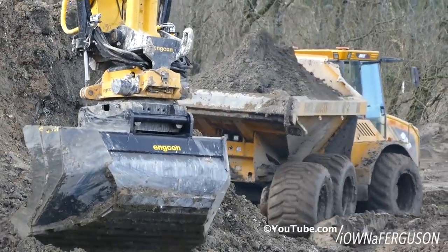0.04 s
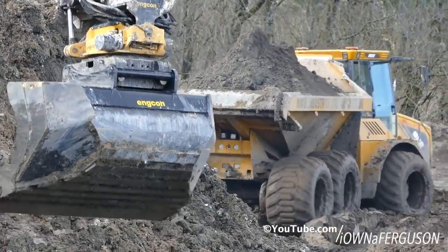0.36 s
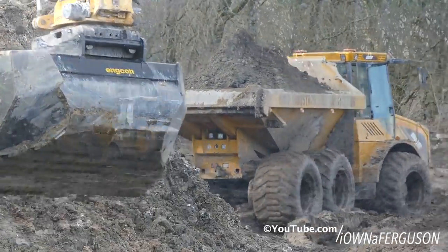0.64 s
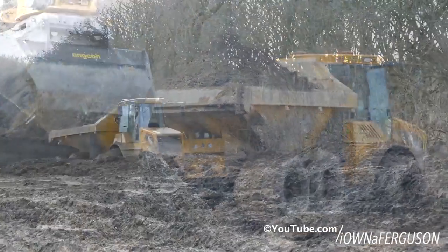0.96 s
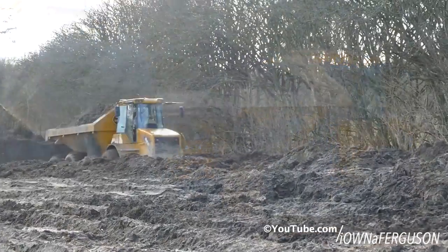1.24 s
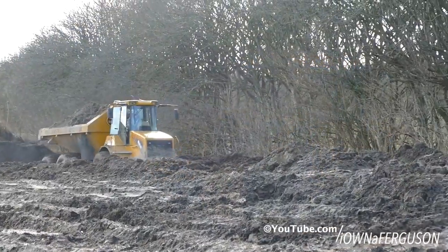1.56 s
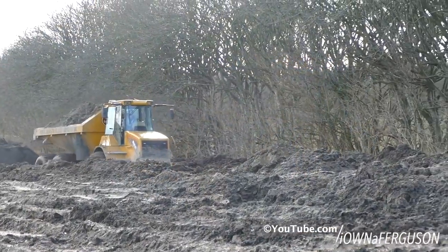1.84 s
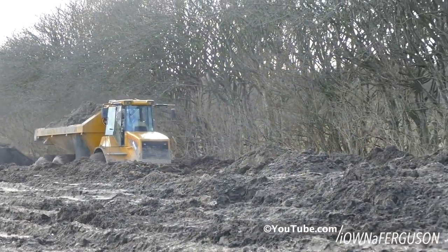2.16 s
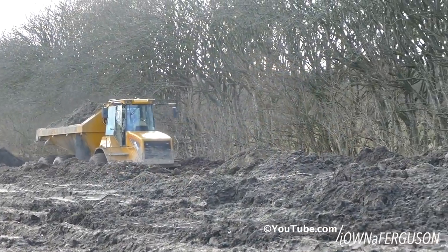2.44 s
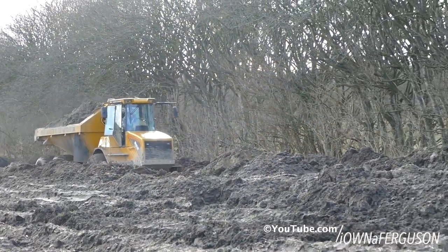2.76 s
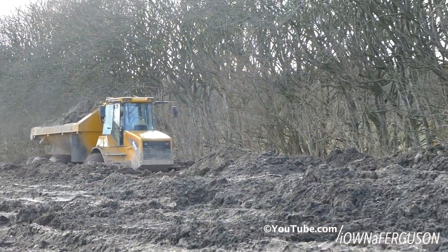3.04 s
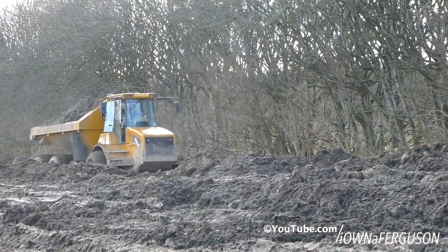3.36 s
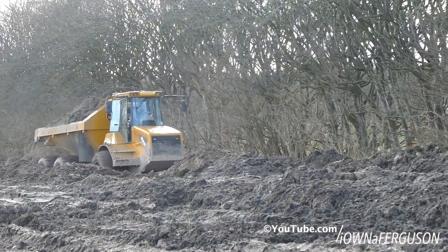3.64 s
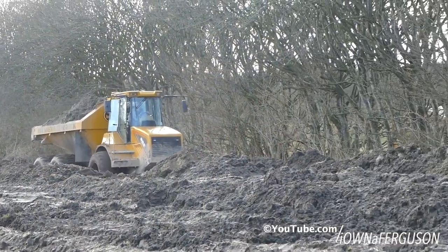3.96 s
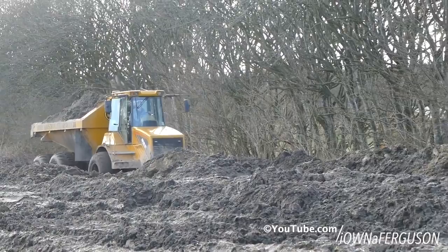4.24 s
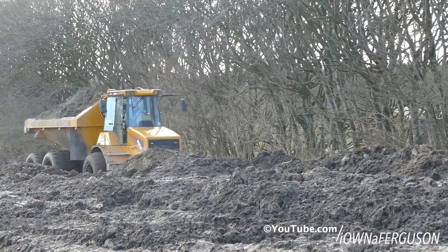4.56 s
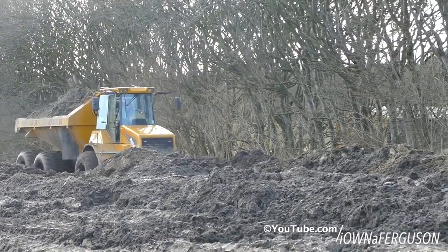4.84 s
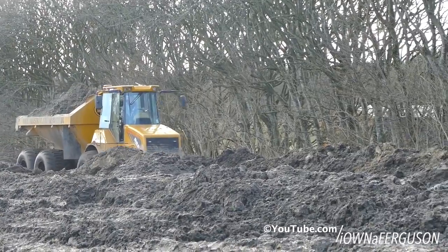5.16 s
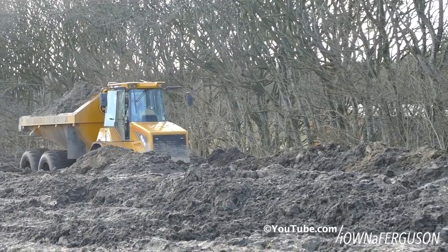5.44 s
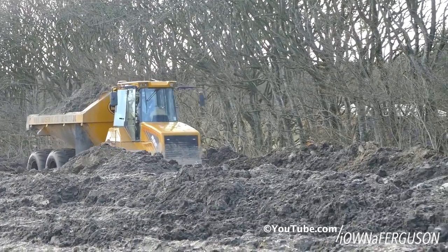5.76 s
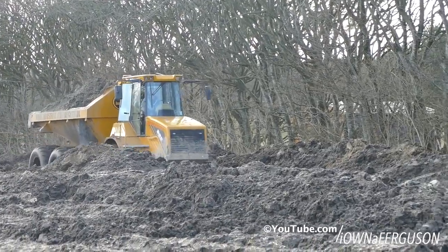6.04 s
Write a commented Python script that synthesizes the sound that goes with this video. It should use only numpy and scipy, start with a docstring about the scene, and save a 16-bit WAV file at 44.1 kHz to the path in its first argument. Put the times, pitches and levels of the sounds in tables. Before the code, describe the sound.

A nearby excavator lugs down as its hydraulics whine, shedding clods with a heavy bucket knock. It quickly blends into a diesel dump truck hauling across a muddy outdoor site. The truck pulls hard, eases off, then surges again with a short gear squeal, its low exhaust drone wavering throughout. Faint wet mud hiss, a small air puff and a distant engine hum sit underneath.

```python
"""An articulated dumper labours through the mud of a building site. Its six-cylinder diesel's exhaust drone
beats against the cooling fan, with a gear whine, while the revs rise and sag with the ruts. The first second is
another scene: close to the microphone, an excavator lugs down as its hydraulics lift the bucket, which sheds
soil and clanks; then the scene changes, the excavator fading out as the dumper fades in. Farther off another
machine hums. The treble has a little stereo width, and the recorder's automatic gain ducks the loud swells."""
import sys
import numpy as np
from scipy import signal
from scipy.fft import rfft, irfft, next_fast_len
from scipy.io import wavfile

SR = 44100
rng = np.random.default_rng(int(sys.argv[2]) if len(sys.argv) > 2 else 0)


def generate_wav(signal):
    """Clip the signal to [-1, 1] and save it as 16-bit WAV at the path in sys.argv[1]."""
    frames = np.transpose(np.atleast_2d(signal))
    scaled = np.clip(frames, -1, 1) * 32767
    pcm = np.round(scaled).astype(np.int16)
    wavfile.write(sys.argv[1], SR, pcm)


N = 269451
CRUISE_HZ = 86  # the dumper's firing rate at cruising revs

# hiss of engine air and of wet mud: freq_hz, level_db
HISS_COLOUR = [(2500, -17), (4200, 10), (5200, 6), (6400, 2), (6900, -5), (7700, -4), (8500, -23),
               (11000, -24), (16000, -24)]


def from_db(db):
    """Decibels to gain."""
    return 10 ** (np.asarray(db) / 20)


def rms_one(x):
    """Scale to rms 1."""
    return x / np.sqrt(np.mean(x ** 2) + 1e-20)


def in_time(rows):
    """Control curve through rows of time_s, value."""
    return np.interp(np.arange(N) / SR, *np.transpose(rows))


def ramp(start_s, end_s):
    """Rises evenly from 0 to 1 between two times."""
    return np.clip((np.arange(N) / SR - start_s) / (end_s - start_s), 0, 1)


def swells(rows):
    """Summed gain of smooth swells (middle_s, length_s, level_db), each 3 dB down at its ends."""
    t = np.arange(N) / SR
    return sum(from_db(db) * 2 ** (-2 * ((t - s) / length) ** 2) for s, length, db in rows)


def coloured(x, spectrum):
    """Filter by a curve of freq_hz, gain_db."""
    size = next_fast_len(N)
    hz, db = np.transpose(spectrum)
    bin_hz = np.arange(size // 2 + 1) * SR / size
    gain = from_db(np.interp(np.log(bin_hz + 1), np.log(hz), db))
    return irfft(rfft(x, size) * gain, size)[:N]


def noise(spectrum):
    """Noise of the given colour, rms 1."""
    return rms_one(coloured(rng.standard_normal(N), spectrum))


def drift(rate_hz):
    """Smooth random wander, spread 1."""
    hop, settle = 40, 2000
    pole = np.exp(-2 * np.pi * rate_hz * hop / SR)
    white = rng.standard_normal(N // hop + settle + 2)
    slow = signal.lfilter([1], [1, -2 * pole, pole * pole], white)[settle:]
    return np.interp(np.arange(N) / hop, np.arange(len(slow)), rms_one(slow))


def turns(hz):
    """Running phase of a rate, in radians."""
    return 2 * np.pi * np.cumsum(hz) / SR


def tone(phase, db, rough, flutter_hz):
    """A line whose strength and phase flutter by the share rough."""
    swell, sway = rough * drift(flutter_hz), rough * drift(flutter_hz)
    return np.sqrt(2) * from_db(db) * ((1 + swell) * np.sin(phase) + sway * np.cos(phase))


def lift_db(hz, resonances):
    """How much a line gains as it passes through resonances."""
    return sum(db / (1 + (2 * (hz - centre) / width) ** 2) for centre, width, db in resonances)


def excavator():
    """A diesel close by: its exhaust drone softens as the revs sag at the start of the lift."""
    # engine speed: time_s, firing_hz
    speed = [(.32, 74.3), (.54, 68), (.78, 70.3), (1.1, 69)]
    # exhaust harmonics: full_speed_db, loss_db_per_hz of sag
    harmonics = [(-11, 0.96), (-16, 0.96)]
    # weaker lines: firing_multiple, level_db against the fundamental
    orders = [(7 / 6, -17.5), (7 / 3, -25.5), (3, -23.5), (4, -15), (8, -30.5)]
    # roar of the block: freq_hz, level_db
    roar_colour = [(150, -9.5), (330, -0.5), (560, 3.5), (720, -3), (930, -6), (1300, -4.5), (1700, -8.5),
                   (2100, -27.5), (3000, -58.5)]
    firing_hz = in_time(speed)
    phase, sag_hz = turns(firing_hz), firing_hz.max() - firing_hz
    levels_db = [db - loss * sag_hz for db, loss in harmonics]
    drone = sum(tone(k * phase, db, rough=.04, flutter_hz=10) for k, db in enumerate(levels_db, 1))
    drone += sum(tone(k * phase, levels_db[0] + db, rough=.25, flutter_hz=4) for k, db in orders)
    return drone + engine_noise(phase, roar_colour, roar_db=-25, clatter_db=-37.5,
                                rumble_db=-23, hiss_db=-56)


def engine_noise(phase, roar_colour, roar_db, clatter_db, rumble_db, hiss_db):
    """Block roar and diesel clatter pulse gently with the firings, over low rumble and a hiss of air."""
    # diesel clatter: freq_hz, level_db
    clatter_colour = [(1200, -11.5), (1900, 3.5), (2250, 2.5), (2800, 4), (3300, 0.5), (3650, -3.5),
                      (4050, -13.5), (5000, -44.5), (8000, -53.5), (12000, -56.5), (15500, -30)]
    # engine rumble: freq_hz, level_db
    rumble_colour = [(15, -17), (30, -10), (55, -5), (75, -2), (105, 1.5), (200, 0), (280, -3), (335, -12),
                     (430, -26), (900, -55)]
    roar = from_db(roar_db + .7 * drift(4.2)) * noise(roar_colour)
    roar *= firing_pulse(phase, depth=.072)
    clatter = from_db(clatter_db + .73 * drift(9.7)) * noise(clatter_colour)
    clatter *= firing_pulse(phase, depth=.11)
    rumble = from_db(rumble_db) * noise(rumble_colour)
    hiss = from_db(hiss_db + .45 * drift(18)) * noise(HISS_COLOUR)
    return roar + clatter + rumble + hiss


def firing_pulse(phase, depth, spread_db=2.5):
    """Gain that swells at each firing, as six cylinders take turns with unequal strength."""
    cylinder = (phase // (2 * np.pi)).astype(int) % 6
    strength = from_db(spread_db * rng.standard_normal(size=6))[cylinder]
    return rms_one(1 + depth * strength * np.sin(phase / 2) ** 4)


def hydraulics():
    """The pump's whine rises with the flow; oil hisses and whistles thinly through a valve."""
    # oil in the valve: freq_hz, level_db
    valve_colour = [(3000, -12), (4800, 10), (6500, 10), (8000, 0.5), (10500, -16), (12000, -1.5),
                    (15000, -21)]
    flow = ramp(0, .44)
    pump_hz = np.interp(flow, [0, 1], [498, 551.4])
    pump = tone(turns(pump_hz), db=-38.5, rough=.58, flutter_hz=10)
    whistle_hz = np.interp(flow, [0, 1], [11550, 11900]) + 25 * drift(30)
    whistle = tone(turns(whistle_hz), db=-76, rough=.4, flutter_hz=25)
    return pump + whistle + from_db(-63) * noise(valve_colour)


def soil(lumpy_db=3.0):
    """Clods slide and tumble in uneven lumps as the bucket lifts."""
    # slides along the bucket: middle_s, length_s, level_db
    slides = [(.62, 0.13, -24.5), (.95, .11, -24.5)]
    # tumbling soil: freq_hz, level_db
    soil_colour = [(80, -14), (130, 0.5), (300, 15), (500, -4.5), (750, 1.5), (1500, -22.5), (2200, -21),
                   (3300, -25.5), (4500, -56)]
    return swells(slides) * rms_one(noise(soil_colour) * from_db(lumpy_db * drift(40)))


def dumper():
    """Exhaust, belt-driven fan, gears and the pulse of the engine noise all follow the crankshaft."""
    # revs rising and sagging with the ruts: time_s, firing_hz
    speed = [(.7, 101.5), (1.08, 80.5), (1.28, 72.6), (1.42, 74.8), (1.72, 74), (2.1, 78.4), (2.6, 82),
             (2.9, 86), (3.14, 86.3), (3.63, 92.9), (3.87, 89.8), (4.4, 85.8), (4.67, 88), (4.79, 82.3),
             (4.9, 82.3), (5.2, 90.8), (5.48, 79.5), (5.74, 91), (6.11, 77)]
    # one long hard pull and a short one: time_s, load_db against full load
    load = [(1.0, -11), (1.12, -1), (1.28, -4.5), (2.15, -.5), (2.55, -1.5), (2.9, -11), (3.14, -10),
            (3.4, -20), (4.15, -34), (4.75, -20), (4.83, -5), (4.94, -4), (5.05, -19), (5.5, -37)]
    # engine noise swelling in the ruts: middle_s, length_s, roar_db, clatter_db
    surges = [(3.35, 0.39, -40, -47.5), (4.3, .45, -49, -53.5), (4.901, 0.22, -39, -64),
              (5.87, 0.22, -45.5, -53.5)]
    # roar of the block: freq_hz, level_db
    roar_colour = [(150, 0.5), (340, -2), (560, 2.5), (850, -1), (1130, 0), (1300, -2.5), (1600, -0.5),
                   (1720, -6), (2100, -10), (3000, -63)]
    firing_hz, load_db = in_time(speed), in_time(load)
    phase, over_cruise_hz = turns(firing_hz), firing_hz - CRUISE_HZ
    # roar and clatter ease slightly as the revs rise
    roar = from_db(-34 - .07 * over_cruise_hz)
    clatter = from_db(-42.5 - .09 * over_cruise_hz)
    roar += swells([(s, length, db) for s, length, db, _ in surges])
    clatter += swells([(s, length, db) for s, length, _, db in surges])
    roar_db, clatter_db = 20 * np.log10([roar, clatter])
    drone = exhaust(firing_hz, phase, load_db) + cylinder_lines(phase, load_db)
    lines = drone + fan(firing_hz, phase) + gears(firing_hz, phase)
    return lines + engine_noise(phase, roar_colour, roar_db, clatter_db, rumble_db=-27, hiss_db=-63)


def exhaust(firing_hz, phase, load_db):
    """The dumper's harmonics grow with the load and bloom in the pipe's resonances."""
    # exhaust harmonics: full_load_db, load_share
    harmonics = [(-9.2, 1), (-17.2, .44), (-23.3, .6), (-41, .3)]
    # pipe resonances and one notch: centre_hz, width_hz, lift_db
    pipe = [(149, 15, 5.5), (171, 4, -6), (179, 13, 6.5), (261, 22, 13), (300, 20, 13.5)]
    levels_db = [db + share * load_db + lift_db(k * firing_hz, pipe)
                 for k, (db, share) in enumerate(harmonics, 1)]
    return -sum(tone(k * phase, db, rough=.06, flutter_hz=7) for k, db in enumerate(levels_db, 1))


def cylinder_lines(phase, load_db):
    """Unequal cylinders add wavering lines among the dumper's harmonics, more so under load."""
    # wavering lines: firing_multiple, relative_db
    orders = [(3 / 2, -8), (7 / 3, -0.14), (5 / 2, -2.7), (7 / 2, -3.5), (13 / 3, -8.5), (5, -12.5),
              (16 / 3, -15.5), (19 / 3, -23.5), (22 / 3, -15), (25 / 3, -18)]
    uneven_db = -34.5 + .24 * load_db
    return sum(tone(k * phase, uneven_db + db, rough=.75, flutter_hz=2.5) for k, db in orders)


def fan(firing_hz, phase, order=2.88, rise_db_per_s=.15):
    """The fan runs just under the third harmonic, so the two throb about ten times a second."""
    # cowl resonance: centre_hz, width_hz, lift_db
    cowl = [(239, 36, 7.3)]
    approach_db = rise_db_per_s * np.arange(N) / SR  # the grille nears the microphone
    level_db = -31 + approach_db + lift_db(order * firing_hz, cowl)
    return tone(order * phase, level_db, rough=.12, flutter_hz=6)


def gears(firing_hz, phase, order=53 / 3, db_per_hz=.56):
    """The gears' whine grows with the revs and swells to a squeal under strain."""
    # squeals: middle_s, length_s, level_db
    squeals = [(2.71, .12, -41), (4.835, .085, -29.5)]
    gain = from_db(-48 + db_per_hz * (firing_hz - CRUISE_HZ)) + swells(squeals)
    return gain * tone(order * phase + .4 * drift(5), db=0, rough=.32, flutter_hz=16)


def far_hum():
    """Farther off across the site another engine holds its speed, wavering a little."""
    # lines of the hum: pitch_hz, level_db
    lines = [(301, -39.5), (375, -49), (470, -50.5), (1650, -52)]
    speed = 1 + .008 * drift(.8)
    return sum(tone(turns(hz * speed), db, rough=.49, flutter_hz=5.3) for hz, db in lines)


def bucket(thud_t60_s=.074):
    """Each knock is a dull burst of the heavy shell and a short ring of the steel linkage."""
    # knocks: start_s, thud_db, ring_db
    knocks = [(.7965, -8.5, -27.5), (.8058, -12, -42), (.859, -30, -51), (.921, -25, -49), (.935, -24, -45),
              (.974, -25, -41), (.98, -24, -37.5)]
    # modes of the linkage: pitch_hz, relative_db, t60_s
    steel = [(2595, 7.5, 0.039), (5200, -5.5, .05), (5425, -10, 0.046), (6340, -10.5, 0.025),
             (7700, -16, 0.029), (8950, -24, 0.046)]
    # thud of the shell: freq_hz, level_db
    thud_colour = [(60, -3), (250, 10), (600, 6.5), (1000, -5.5), (1700, -6), (2200, -13), (3100, -8.5),
                   (3800, -35), (4600, -39), (8000, -53), (14000, -68)]
    out, shell = np.zeros(N), noise(thud_colour)
    age = np.arange(SR // 2) / SR
    attack = 1 - np.exp(-(age / .0012) ** 2)  # caked soil softens the contact
    for start_s, thud_db, ring_db in knocks:
        start = round(start_s * SR)
        span = slice(start, start + len(age))
        thud = from_db(thud_db - 60 * age / thud_t60_s) * shell[span]
        ring = 0
        for hz, db, t60 in steel:
            struck_db = ring_db + db + rng.normal(0, 2.9)
            ring += from_db(struck_db - 60 * age / t60) * np.sin(2 * np.pi * hz * age)
        out[span] += attack * (thud + ring)
    return out


def tyres():
    """Wet mud hisses under the dumper's wheels."""
    # swishes: middle_s, length_s, level_db
    swishes = [(1.85, 1, -60), (3.25, 0.18, -55.5), (4.16, .3, -56.5)]
    return swells(swishes) * noise(HISS_COLOUR)


def air_puff(start_s=5.47):
    """Air escaping from the dumper starts bright and dulls as its pressure falls."""
    # bright onset: freq_hz, level_db
    bright = [(1200, -14), (2000, 4), (2800, 6), (4200, -20), (7000, -28), (12000, -39)]
    # dull tail: freq_hz, level_db
    dull = [(500, 0), (900, -0.5), (1400, 12), (2200, -19), (4000, -47)]
    out, age = 0, np.arange(N) / SR - start_s
    for colour, attack_s, t60_s, db in [(bright, .019, .22, -45.5), (dull, .036, .2, -46)]:
        rise = np.clip(age / attack_s, 0, 1) ** 2
        decay = from_db(db - 60 * np.maximum(age - attack_s, 0) / t60_s)
        out += rise * decay * noise(colour)
    return out


def stereo_width(mid, lag=SR // 14):
    """Side signal: a faint delayed copy, mostly treble, widens the sound a little."""
    # colour of the copy: freq_hz, side_minus_mid_db
    width = [(30, -29), (70, -49.5), (250, -60), (500, -56.5), (1400, -46), (2800, -24.5), (4500, -16),
             (8000, -10), (15000, -10.5)]
    delayed = np.pad(mid, (lag, 0), mode="reflect")[:N]
    return coloured(delayed, width)


def gain_control(x, threshold_db=-20.5, share=.4, recovery_db_per_s=30.5, detector_s=.073):
    """A loud swell turns the recorder down after a short lag; the gain then recovers steadily."""
    power, pole = np.mean(x ** 2, axis=0), np.exp(-1 / (detector_s * SR))
    power, _ = signal.lfilter([1 - pole], [1, -pole], power, zi=[power.mean()])
    excess_db = np.maximum(10 * np.log10(power + 1e-12) - threshold_db, 0)
    recovered_db = recovery_db_per_s * np.arange(N) / SR
    held_db = np.maximum.accumulate(excess_db + recovered_db) - recovered_db
    return x * from_db(-share * held_db)


def scene():
    """In front of a stereo microphone, the scene changes from the excavator to the dumper, one fading out as
    the other fades in."""
    fade_out, fade_in = 1 - ramp(.82, 1.38), ramp(.64, .96)
    digging = fade_out * (excavator() + hydraulics()) + soil() + bucket()
    hauling = fade_in * (dumper() + tyres() + air_puff() + far_hum())
    mid = digging + hauling
    # the bass is a shade stronger on the right
    bass_lean = coloured(mid, [(70, -36), (150, -44), (400, -64.5), (2000, -48)])
    side = stereo_width(mid) - bass_lean
    return np.array([mid + side, mid - side])


def record(dry, cutoff_hz=15400):
    """The recorder: automatic gain, then a steep cut of the top."""
    lowpass = signal.ellip(10, .1, 80, cutoff_hz, fs=SR, output="sos")
    return signal.sosfilt(lowpass, gain_control(dry))


dry = scene()
out = record(dry)
generate_wav(out)
```